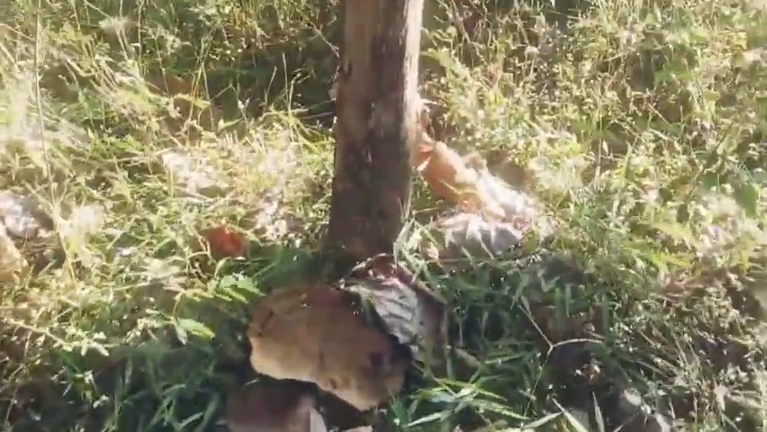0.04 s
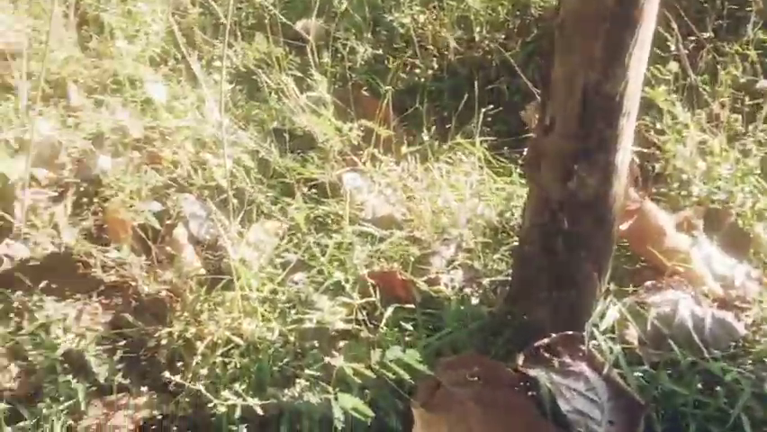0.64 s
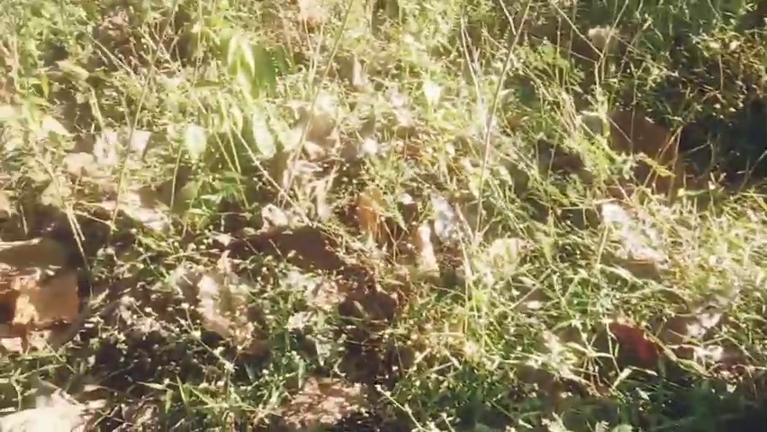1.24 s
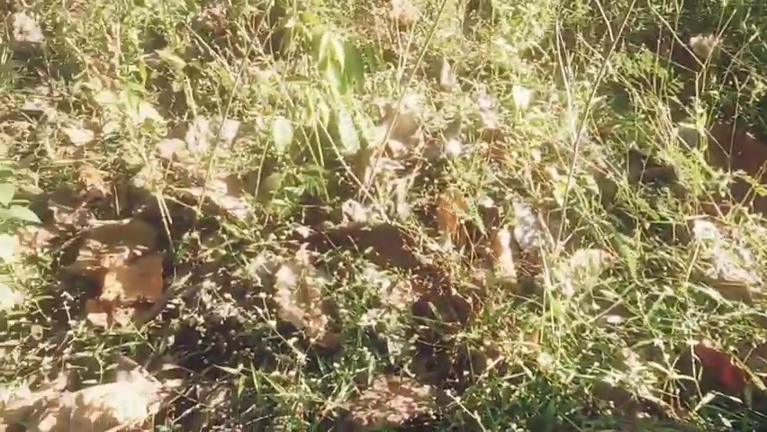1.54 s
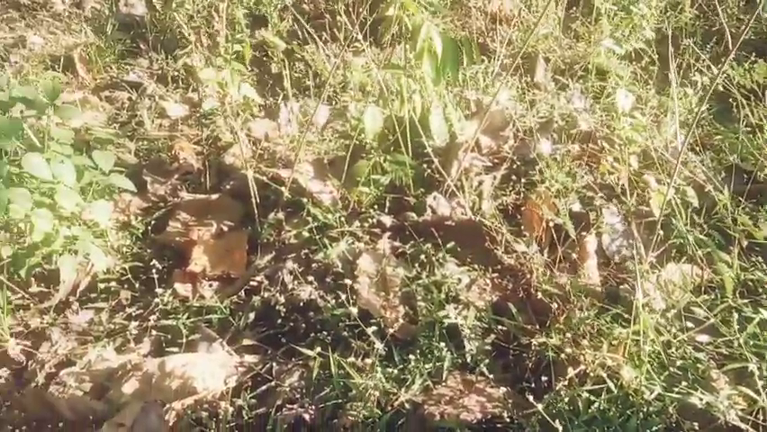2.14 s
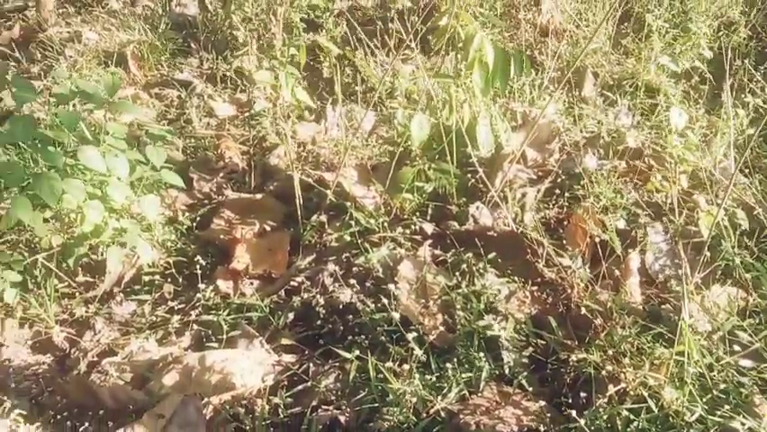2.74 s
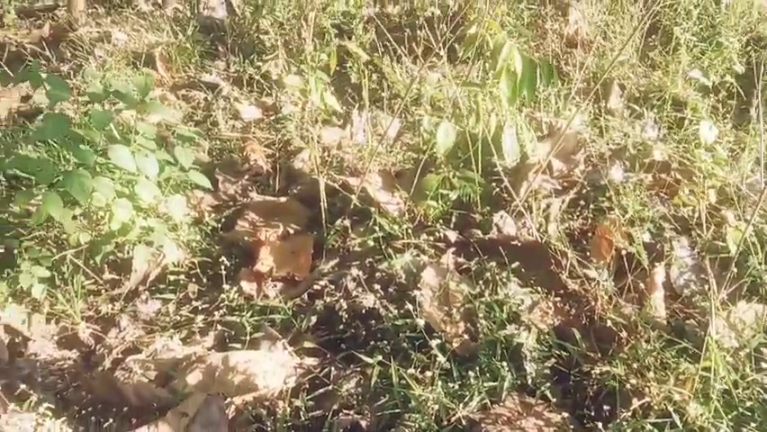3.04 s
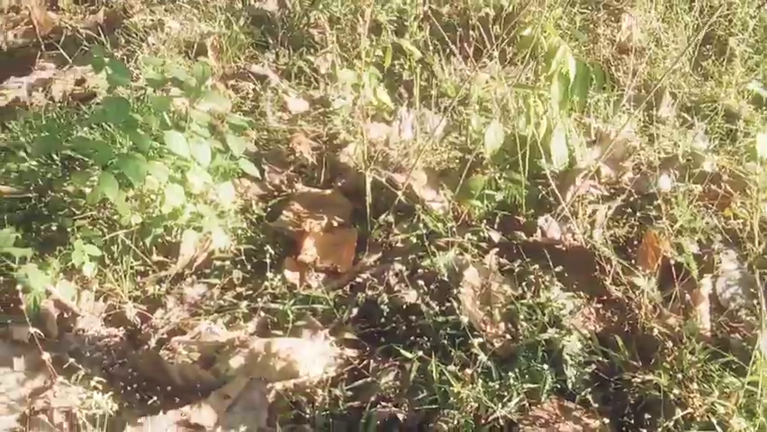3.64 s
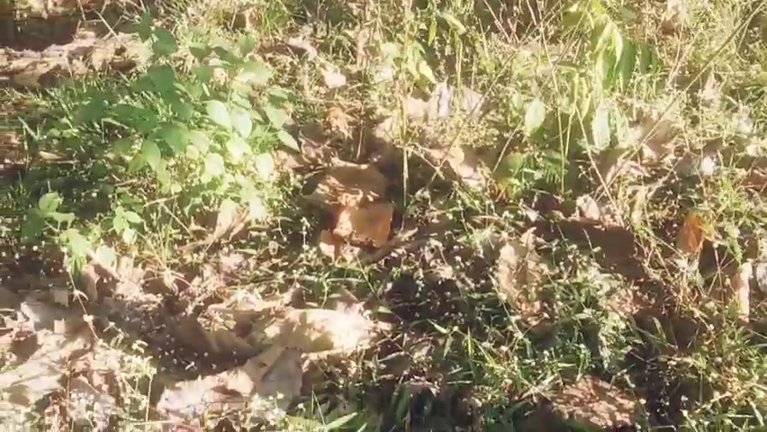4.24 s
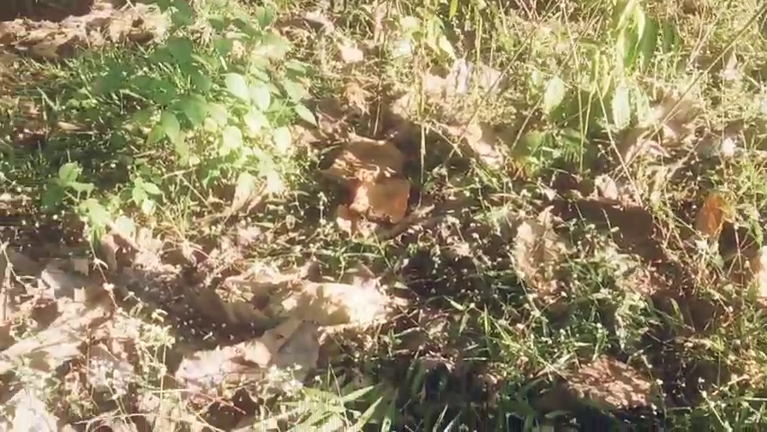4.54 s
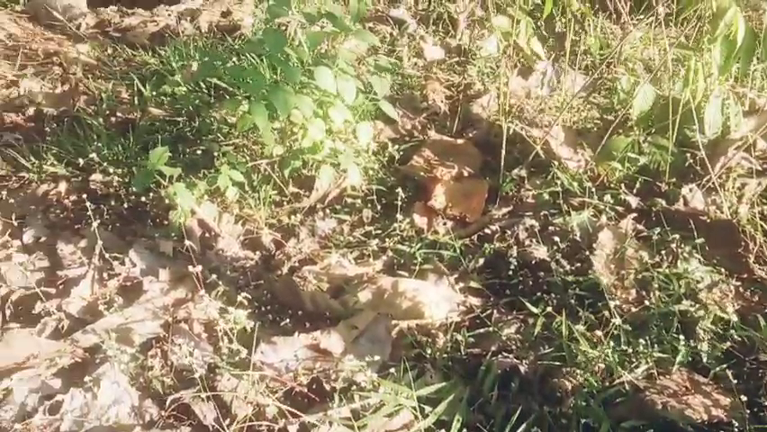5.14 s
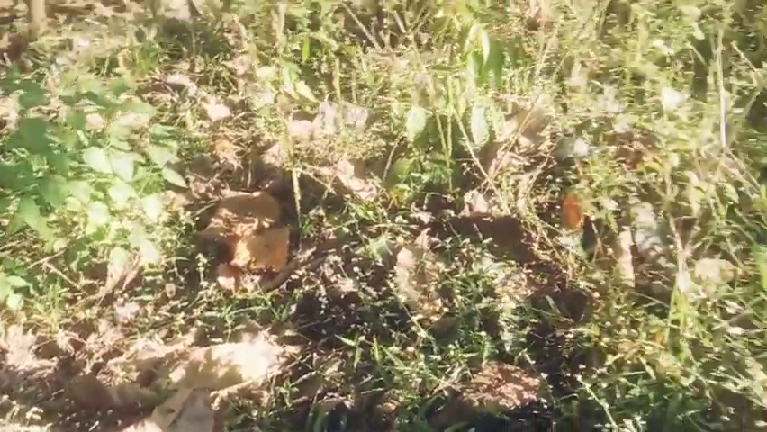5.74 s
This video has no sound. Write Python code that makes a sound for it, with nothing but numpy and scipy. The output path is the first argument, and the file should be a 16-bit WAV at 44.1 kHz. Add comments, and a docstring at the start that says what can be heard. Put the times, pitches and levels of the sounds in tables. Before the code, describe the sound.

Close footsteps crunch into dry fallen leaves and grass right from the start, with crisp crackling and small stalks snapping. A second, heavier crunch comes from about 0.6 to 1 second and is the loudest moment. The walker then stands still, and the pressed leaves tick and rustle, thinning out by about 2.5 seconds. From around 1 second, insects are heard with a soft, high, fluttering buzz that continues in uneven phrases to the end. A faint low drone, like a distant motor, swells between 1 and 1.6 seconds. Very faint, far birds call between 1.2 and 2.6 seconds and again after 5 seconds. Light leaf rustles come at around 4 seconds, and a few small crackles near 5.6 to 6 seconds. A quiet outdoor rumble and thin hiss lie underneath throughout.

```python
"""A dense crunch of steps in dry fallen leaves and grass, then someone stands still.
The sole crushes leaves in thousands of tiny breaks, stalks snap, blades slide over each other,
and the pressed litter ticks on as the weight settles. Insects rub their wings in a steady buzz;
birds call far off, and a low drone swells briefly over a faint outdoor rumble."""
import sys
import numpy as np
from scipy import signal
from scipy.fft import rfft, irfft
from scipy.io import wavfile
from scipy.ndimage import uniform_filter1d

SR = 44100
rng = np.random.default_rng(int(sys.argv[2]) if len(sys.argv) > 2 else 0)


def wav_out(sig):
    """Save sig, one row per channel (or a flat mono array), as 16-bit PCM at SR to the path in sys.argv[1]."""
    wavfile.write(sys.argv[1], SR, np.round(np.clip(np.atleast_2d(sig).T, -1, 1) * 32767).astype(np.int16))


N = 265041
TIME = np.arange(N) / SR
LEAF_HZ = 4500  # pitch of a typical leaf's crack


def undb(db):
    """Decibels to gain."""
    return 10 ** (np.asarray(db) / 20)


def unit(x):
    """Scale to rms 1."""
    return x / np.sqrt(np.mean(x ** 2) + 1e-30)


def colour(x, points):
    """Causal EQ through (f/Hz, level/dB) points, so that clicks keep their sharp front."""
    size = 4096
    hz, db = np.transpose(points)
    bin_hz = np.maximum(np.arange(size // 2 + 1) * SR / size, 1)
    gain = undb(np.interp(np.log(bin_hz), np.log(hz), db))
    cepstrum = irfft(np.log(gain))
    cepstrum[1:size // 2] *= 2  # fold to minimum phase
    cepstrum[size // 2 + 1:] = 0
    impulse = irfft(np.exp(rfft(cepstrum)))
    return signal.fftconvolve(x, impulse)[:len(x)]


def band(x, lo_hz, hi_hz, order=2):
    """Band-pass, scaled to rms 1."""
    edges = np.clip([lo_hz, max(hi_hz, lo_hz + 10)], 10, [SR / 2 - 20, SR / 2 - 10])
    return unit(signal.sosfilt(signal.butter(order, edges, "band", fs=SR, output="sos"), x))


def walk(rate):
    """Random drift that glides to a new value rate times a second; rms 1."""
    hold = max(int(SR / rate), 1)
    steps = np.repeat(rng.standard_normal(N // hold + 1), hold)
    return unit(uniform_filter1d(steps, hold)[:N])


def envelope(start, hold, attack_s, release_s):
    """Rises to 1 at the start, holds, then dies away; attack and release are time constants."""
    return np.exp(np.minimum(TIME - start, 0) / attack_s - np.maximum(TIME - start - hold, 0) / release_s)


def swell(start, length):
    """The samples of a short sound, and its rounded rise and fall."""
    span = np.flatnonzero((TIME >= start) & (TIME < start + max(length, .01)))
    return span, signal.windows.tukey(len(span), .6)


def resonance(drive, hz, width_hz, order=3):
    """A narrow, noise-driven resonance whose centre may move; rms 1."""
    push = drive * (rng.standard_normal(N) + 1j * rng.standard_normal(N))
    swing = signal.sosfilt(signal.butter(order, width_hz / 2, fs=SR, output="sos"), push)
    phase = 2 * np.pi * np.cumsum(hz * np.ones(N)) / SR
    return unit(np.real(swing * np.exp(1j * phase)))


def fractures(rate, spread_db):
    """Tiny breaks at random moments, many small and a few large; mean power near 1."""
    happens = rng.random(N) < rate / SR
    size = undb(spread_db * np.minimum(rng.exponential(size=N), 4))
    clicks = happens * size * rng.choice([-1, 1], N)
    power = np.maximum(uniform_filter1d(clicks ** 2, SR // 20), 0)
    return clicks / np.sqrt(power + 1e-9)


def air():
    """The bed: distant outdoor rumble and a thin even hiss."""
    # spectrum of still air outdoors: f/Hz, level/dB
    spectrum = [(20, -17), (40, -9), (65, 7), (100, 2), (160, -1), (230, 2), (320, -10.5), (600, -14),
                (1000, -21.5), (4000, -24), (8000, -26), (16000, -33.5)]
    return undb(-73 + 0.64 * walk(4)) * unit(colour(rng.standard_normal(N), spectrum))


def drone():
    """A low wavering drone, perhaps a far motor, that ends in a duller rumble."""
    # partials of the drone: f/Hz, level/dB
    partials = [(145, -12.5), (194, -4), (243, -1)]
    # its swells: t/s, hold/s, level/dB
    swells = [(0.93, 0.285, -60.5), (1.269, 0.16, -59.5), (1.5, 0.11, -62)]
    hum = 0
    for hz, db in partials:
        tone = np.sin(2 * np.pi * hz * TIME + rng.uniform(0, 2 * np.pi))
        hum += undb(db) * (tone + .5 * resonance(1, hz, width_hz=29, order=2))
    level = sum(undb(db) * envelope(s, hold, attack_s=0.021, release_s=0.0079) for s, hold, db in swells)
    waver = undb(4 * walk(22))
    out = level * waver * unit(hum)
    span, shape = swell(start=1.47, length=0.11)
    rumble = band(rng.standard_normal(N), 66, 166, order=3)
    out[span] += undb(-57) * shape * unit(rumble[span])
    return out


def birds():
    """Distance leaves one partial of each call, blurred by many paths through the trees."""
    # far calls: t/s, length/s, level/dB, first f/Hz, last f/Hz, blur/Hz
    calls = [(1.184, 0.23, -71, 1415, 1287, 71), (1.515, 0.25, -78.5, 605, 601, 35.2),
             (1.799, 0.12, -71, 620, 588, 44.7), (2.056, 0.14, -69.5, 594, 647, 36),
             (2.51, 0.088, -83, 602, 580, 24.4), (5.195, 0.58, -78.5, 1372, 1442, 161.4),
             (5.481, 0.2, -77.5, 422.5, 380, 45), (5.669, 0.28, -72.5, 1402, 1342, 168.5)]
    out = np.zeros(N)
    paths = rng.standard_normal(N) + 1j * rng.standard_normal(N)
    for s, length, db, first_hz, last_hz, blur_hz in calls:
        span, shape = swell(s, length)
        blur = signal.sosfilt(signal.butter(2, blur_hz / 2, fs=SR, output="sos"), paths[span])
        phase = 2 * np.pi * np.cumsum(np.linspace(first_hz, last_hz, len(span))) / SR
        out[span] += undb(db) * shape * unit(np.real(blur * np.exp(1j * phase)))
    return out


def strokes(rate, depth_db, wander):
    """Tremolo of wings that rub to and fro, slightly unevenly."""
    cycles = np.cumsum(rate * (1 + wander * walk(16))) / SR
    return undb(depth_db * np.cos(2 * np.pi * cycles))


def chorus_and_hiss():
    """Each kind of insect rubs its wings at its own pitch; a faint high hiss flickers alongside."""
    # level curve of the high buzz: t/s, level/dB
    high_curve = [(1.4, -67), (2.6, -74), (3.0, -71.5), (3.35, -77.5), (3.55, -73), (4.3, -72),
                  (4.7, -79.5), (5.3, -73), (6.0, -70.5)]
    # a far insect at 5440 Hz, then faint flickering hiss near 9-10 kHz: f/Hz, width/Hz, level/dB
    faint_bands = [(5440, 360, -85.5), (9350, 510, -87.5), (9940, 260, -87.5)]
    high_wings = strokes(130, depth_db=-1.5, wander=.1)
    high = resonance(high_wings, 6124 + 60 * walk(6.7), width_hz=450, order=4)
    high *= undb(np.interp(TIME, *np.transpose(high_curve)))
    peak_s, period_s, dip_db = 1.13, 0.205, 14.5  # the trill comes in regular bursts
    bursts = undb(-75.5 - dip_db * np.sin(np.pi * (TIME - peak_s) / period_s) ** 2)
    trill_wings = strokes(55, depth_db=1.5, wander=0.06)
    trill = bursts * resonance(trill_wings, 7276 + 35 * walk(6), width_hz=89, order=2)
    faint = 0
    for hz, width_hz, db in faint_bands:
        flicker = undb(6 * np.clip(walk(29), -2, 2))
        faint += undb(db) * resonance(flicker, hz, width_hz)
    whine = undb(-95) * resonance(1, 12300, width_hz=220, order=2)  # one thin steady insect
    return high + trill + faint + whine


def buzz(pitch_hz):
    """One insect drags a toothed file over a scraper: each wing stroke swells, sinks in pitch, fades."""
    strokes_per_s, sag_hz, wander_hz, depth_db = 28, 278, 30.35, 3
    stroke = np.cumsum(strokes_per_s * (1 + .25 * walk(20))) / SR % 1
    wings = undb(-depth_db * np.cos(2 * np.pi * stroke))
    hz = pitch_hz + wander_hz * walk(8) + sag_hz * (.5 - stroke)
    teeth = strokes(200, depth_db=1.5, wander=0.13)
    return resonance(wings * teeth, hz, width_hz=450, order=6)


def near_insects():
    """Two neighbours sing the same phrases, their wing strokes out of step."""
    # phrases of the song: t/s, length/s, level/dB, f/Hz
    phrases = [(0.894, 0.42, -61.5, 4750), (1.41, 0.45, -61, 4650), (1.965, 0.042, -67.5, 4800),
               (2.066, 0.5, -63, 4680), (2.79, 0.086, -64, 4580), (2.89, 0.078, -64, 4800),
               (3.04, 0.074, -65.5, 4500), (3.16, 0.07, -62, 4880), (3.3, 0.22, -64, 4720),
               (3.54, 0.064, -62, 4580), (3.774, .1, -61.5, 4650), (4.005, 0.4, -60, 4590),
               (4.502, 0.25, -63, 4600), (4.847, 0.071, -55, 4670), (4.979, 0.27, -61.5, 4580),
               (5.347, 0.13, -62, 4620), (5.614, 0.37, -60, 4660)]
    gains = np.array([undb(db) * envelope(s, length, attack_s=0.036, release_s=0.06)
                      for s, length, db, _ in phrases]) + 1e-12
    pitch_hz = np.array(phrases)[:, 3] @ gains / gains.sum(axis=0)  # glides from phrase to phrase
    level = np.maximum(gains.max(axis=0), undb(-77))  # a soft buzz stays between phrases
    return level * unit(buzz(pitch_hz) + buzz(pitch_hz))


def swishes():
    """Blades and loose leaves slide lightly over each other: a fine grain of tiny slips."""
    # slides: t/s, length/s, level/dB, f/Hz, width/Hz
    slides = [(1.445, 0.1, -71, 4470, 3930), (1.632, 0.049, -57.5, 3660, 4820),
              (1.686, 0.24, -61, 4300, 4540), (3.407, .09, -82.5, 3540, 1510),
              (3.787, 0.13, -62, 5780, 1616), (3.958, 0.13, -71.5, 6060, 2217),
              (4.183, 0.1, -62.5, 5900, 2180), (4.829, 0.089, -79.5, 3460, 2470),
              (5.273, 0.087, -75, 3270, 2190), (5.687, 0.3, -70.5, 4680, 4500)]
    out, slips = np.zeros(N), fractures(420, spread_db=1.0)
    for s, length, db, hz, width in slides:
        span, shape = swell(s, length)
        grain = band(slips[span], max(hz - width / 2, 1200), hz + width / 2, order=3)
        out[span] += undb(db) * shape * grain
    return out


def ticks(count=26):
    """The litter springs back in small ticks that thin out and fade; gives rows for snaps()."""
    start_s, first_gap_s, gap_growth, fade_db_per_s = 0.99, 0.022, 1.054, 15.5
    when, loud, pitch, tear = rng.uniform(-1, 1, (count, 4)).T
    gaps = first_gap_s * gap_growth ** np.arange(count)
    ages = np.cumsum(gaps) + gaps * when / 2
    levels_db = -60 - fade_db_per_s * ages + 3 * loud
    pitches_hz = LEAF_HZ * 2 ** (0.26 * pitch)
    tears_s = 0.0048 * 2 ** tear
    return [(*tick, -20, 0) for tick in zip(start_s + ages, levels_db, pitches_hz, tears_s)]


def snap(hz, tear_s, body_db, flap_db, edge_db, chance):
    """A first crack, then a dying run of smaller ones as the tear spreads and the leaf's modes ring."""
    timing, strength, detune = chance  # three rows of Gaussian noise
    t = TIME[:len(timing)]
    cracks = (timing > 1) * strength * np.exp(-t / tear_s) * (1 - np.exp(-3 * t / tear_s))
    # a brittle stalk goes in one crack, a leaf gives way bit by bit
    cracks[0] += np.sqrt(0.0025 / tear_s) * np.linalg.norm(cracks) + 1e-6
    mode_ratio, mode_spread, ring_cycles = 0.72, 0.25, 13  # five short modes, mostly below the crack
    mode_hz = np.minimum(mode_ratio * hz * np.exp(mode_spread * detune[:5, None]), 9000)
    modes = np.cos(2 * np.pi * mode_hz * t) * np.exp(-mode_hz * t / ring_cycles)
    ringing = signal.fftconvolve(cracks, modes.sum(axis=0))[:len(t)]
    ring = band(unit(cracks) + 0.17 * unit(ringing), hz * 0.641, hz * 1.374, order=6)
    body = undb(body_db) * band(cracks, 330, 976, order=4)
    flap = undb(flap_db) * band(cracks, 1544, 2750, order=4)
    # bright edge of a crack: f/Hz, level/dB
    edge_eq = [(3500, -44), (6000, 5.5), (7000, 4), (10000, 5), (12500, -5), (16000, -7.5)]
    edge = undb(edge_db) * unit(colour(cracks, edge_eq))
    return (ring + body + flap + edge) * np.sqrt(SR / 100 / len(t))  # ring energy: 10 ms at rms 1


def snaps():
    """Leaves and stalks break one by one; a papery leaf adds flap and edge to a stalk's bare ring."""
    # single breaks: t/s, ring level over 10 ms/dB, f/Hz, tear/s, hollow body/dB, papery share/dB
    breaks = [(0.0076, -38.5, 3980, 0.00021, -9.5, -5), (0.016, -43, 3720, .0004, -21, -7),
              (0.0253, -45, 3860, 0.00082, -13, 6), (0.0485, -38, 3540, 0.0012, -39, -2),
              (0.121, -53, 3840, 0.00046, -1, 1.5), (0.1758, -44, 3250, 0.00037, -25, -11),
              (0.1926, -30.5, 3290, 0.00073, 0, -6.5), (0.6025, -35, 3810, 0.0021, -7.5, -10),
              (0.6578, -36.5, 3580, 0.00088, -1.5, -0.5), (0.673, -41.5, 4650, 0.0047, 2.5, 1),
              (0.7287, -41, 4550, 0.0046, -2.5, 2), (0.805, -37.5, 4800, 0.0036, -30, 4),
              (0.8108, -36.5, 5100, .003, -33, 3), (0.837, -44, 4000, 0.0015, 3, 5),
              (0.8745, -32, 4280, 0.00048, -23, 2.5), (0.878, -40, 4500, 0.0014, -26, 9.5),
              (0.881, -35.5, 4230, 0.0026, -6, 4.5), (0.905, -48, 4330, .0004, -17, 4),
              (0.9412, -43, 5300, 0.00019, -36, -4), (0.971, -42, 4480, 0.0023, -1.5, 1),
              (0.9866, -39, 4080, 0.0012, -20, 2), (1.015, -46, 4820, .0033, -18, -3),
              (1.0575, -41.5, 4100, .0062, -39, -4), (1.0805, -44, 3550, 0.0022, -36, 1),
              (1.1103, -47.5, 3840, 0.0029, -32, -4), (1.16, -51.5, 5300, 0.00095, -31, 9.5),
              (1.165, -45.5, 4600, 0.0015, -31, -1.5), (1.232, -54.5, 4870, .0034, -27, -14),
              (1.301, -57.5, 4660, 0.0023, -20, 6), (1.379, -64, 5260, 0.0016, -35, -17),
              (1.412, -43, 3860, 0.00023, -48, -42), (1.4488, -52, 4930, 0.01, -26, -1.5),
              (1.4651, -53.5, 4650, 0.0056, -34, 0), (1.492, -51, 4270, .014, -33, -8),
              (1.59, -48, 3350, 0.003, -44, -5), (1.631, -53, 4800, .0024, -46, -2),
              (1.6438, -45.5, 4230, 0.0049, -23.5, -2.5), (1.7102, -49.5, 5170, 0.0031, -43, -3.5),
              (1.7167, -49.5, 4270, 0.0078, -39, 3), (1.7375, -56.5, 4770, 0.013, -13.5, 3),
              (1.754, -58.5, 4430, 0.0041, -32, 3), (1.7921, -49, 4070, 0.0064, -30, -6),
              (1.8424, -46.5, 4480, 0.0059, -20.5, -1.5), (1.9626, -48, 4310, 0.0069, -31, 0.5),
              (2.0634, -51.5, 5070, 0.0049, -31.5, -1.5), (2.25, -47, 4410, 0.0075, -22.5, 4),
              (2.311, -64, 3170, .005, -14, -6), (2.3493, -52.5, 4970, 0.0055, -32, -6.5),
              (2.4152, -58, 4030, 0.0053, -21, 2.5), (2.8958, -57.5, 5110, 0.0069, -15.5, -1.5),
              (2.9672, -70.5, 4310, .0065, -15, -8), (3.1582, -71.5, 3400, 0.0035, -17, -19),
              (3.447, -67.5, 3700, .002, -14.5, -9), (3.463, -68, 3990, 0.0057, -19.5, -7),
              (3.6185, -73.5, 4710, 0.0029, -23.5, 4), (3.815, -59, 2570, 0.0057, -29.5, 2),
              (3.9622, -66.5, 5060, .0021, -15.5, -5.5), (4.0329, -65.5, 5840, .0035, -20, -10),
              (4.2016, -63, 5380, 0.01, -22.5, 4), (4.236, -72, 5480, 0.002, -32.5, 7),
              (4.9083, -68, 4780, 0.0089, -24, 1), (5.271, -69, 4630, 0.0079, -13, -1),
              (5.309, -66, 3280, .003, -12, -6), (5.6194, -54.5, 4200, 0.0016, -34, -13.5),
              (5.7551, -67, 4060, 0.0017, -24, -13), (5.792, -55.5, 4760, 0.014, -26, -7),
              (5.8975, -62.5, 4280, 0.0065, -32.5, -4), (5.918, -70, 3390, 0.0046, -25, -3)]
    rows, size = breaks + ticks(), SR // 12
    out = np.zeros(N + size)
    chances = rng.standard_normal((len(rows), 3, size))
    for (s, db, hz, tear_s, body_db, papery_db), chance in zip(rows, chances):
        bright_db = 5.5 * np.log2(hz / LEAF_HZ)  # smaller, higher leaves: more edge, less flap
        flap_db = -8.5 + papery_db - bright_db
        edge_db = -4.5 + papery_db + bright_db
        start = int(s * SR)
        out[start:start + size] += undb(db) * snap(hz, tear_s, body_db, flap_db, edge_db, chance)
    return out[:N]


def footsteps():
    """The harder the sole presses, the more leaves break each second; the packed layer sounds hollow."""
    # pushes into the litter: t/s, hold/s, crackle level/dB, crush re crackle/dB, thud re crackle/dB
    pushes = [(0.0, 0.018, -40.5, -4.5, -24), (0.075, 0.024, -51.5, -13.5, -29),
              (0.135, 0.098, -49.5, -2, -21.5), (0.258, 0.028, -43, -0.5, -12.5),
              (0.39, 0.14, -50.5, -7.5, -39), (0.59, .13, -39, -9, -9), (0.738, .08, -32.5, -8, -12.5),
              (0.876, 0.0036, -35.5, -11.5, -12.5), (0.99, 0.15, -51, -17, -34.5),
              (1.2, 0.083, -58.5, -18, -26)]
    # crackle of dry leaves: f/Hz, level/dB
    crackle_eq = [(500, -44.5), (900, -5), (1500, -1), (2600, -0.5), (4000, -1.5), (5200, -1), (6500, -0.5),
                  (7800, -11.5), (10000, -10), (12500, -16), (16000, -16)]
    # hollow crush of the packed layer below: f/Hz, level/dB
    crush_eq = [(150, -43.5), (400, -13.5), (600, 2.5), (850, 0), (1200, 1), (1600, -6.5), (2500, -21.5)]
    # thud of the weight: f/Hz, level/dB
    thud_eq = [(40, -43.5), (100, -19.5), (200, -8), (300, -4.5), (420, 0.5), (520, 1), (700, -8),
               (1400, -49)]
    crackle_power = crush_power = thud_power = 1e-18
    for s, hold, db, crush_db, thud_db in pushes:
        push = undb(db) * envelope(s, hold, attack_s=0.017, release_s=0.03)
        # pressed leaves go on creaking, softer, and die away
        creak = undb(db - 8.5) * envelope(s, hold, attack_s=0.017, release_s=0.12)
        crackle_power += push ** 2 + creak ** 2
        crush_power += (push * undb(crush_db)) ** 2
        thud_power += (push * undb(thud_db)) ** 2
    pressure = np.sqrt(crackle_power) / undb(-35)
    breaks_per_s = 80 + 4000 * np.sqrt(pressure)  # in each band
    crackle = 0
    for hz in np.geomspace(700, 14000, 8):
        # fragments of each size break at their own moments, in small flurries
        flurry = undb(2.8 * walk(90))
        fragments = band(fractures(breaks_per_s, spread_db=1.5), hz * 0.81, hz * 1.29)
        crackle += np.sqrt(hz) * flurry * fragments
    crackle = unit(colour(crackle, crackle_eq)) * np.sqrt(crackle_power)
    crush = unit(colour(fractures(2500, spread_db=0.0), crush_eq)) * np.sqrt(crush_power)
    thud = unit(colour(fractures(1500, spread_db=3.5), thud_eq)) * np.sqrt(thud_power)
    return crackle + crush + thud


def scatter(x, wet_db, t60):
    """Ground, legs and plants throw back a short diffuse tail."""
    t = TIME[:SR // 4]
    tail = band(rng.standard_normal(len(t)), 500, 8000, order=1) * undb(-60 * t / t60)
    return x + undb(wet_db) * signal.fftconvolve(x, tail / np.linalg.norm(tail))[:N]


def scene():
    """Leaves underfoot, insects around, birds far off; mono."""
    leaves = scatter(footsteps() + snaps() + swishes(), wet_db=-19.5, t60=0.23)
    return (leaves + drone() + near_insects() + chorus_and_hiss() + birds() + air())[None]


def record(dry):
    """A steep low-pass takes off the top above 15.9 kHz."""
    return signal.sosfilt(signal.ellip(10, .2, 70, 15900, fs=SR, output="sos"), dry)


dry = scene()
out = record(dry)
wav_out(out)
```